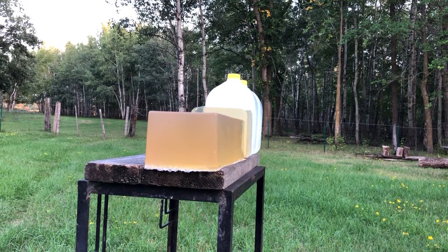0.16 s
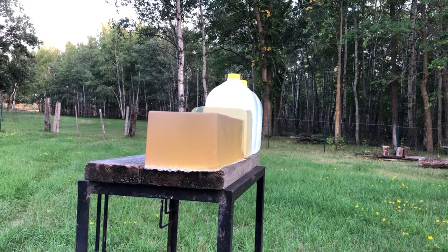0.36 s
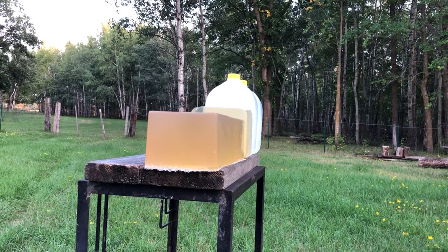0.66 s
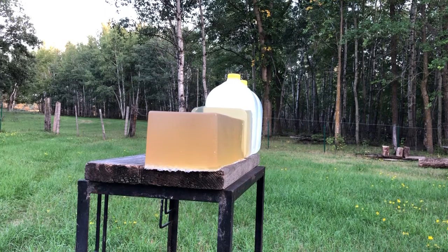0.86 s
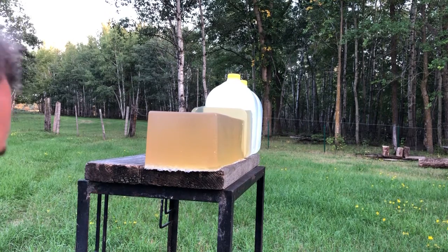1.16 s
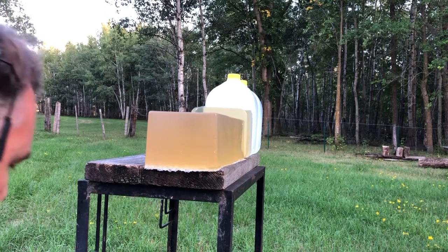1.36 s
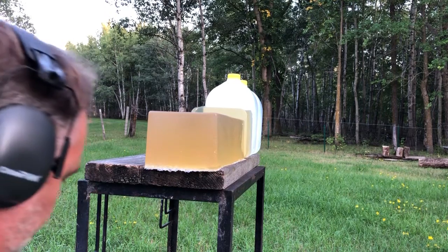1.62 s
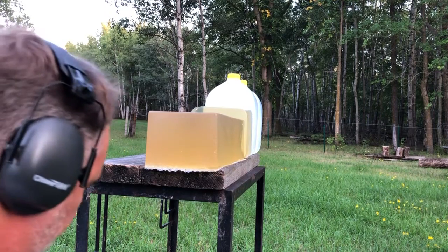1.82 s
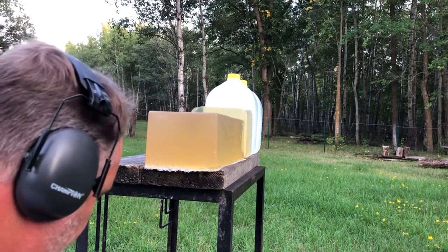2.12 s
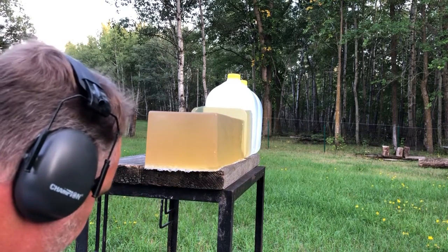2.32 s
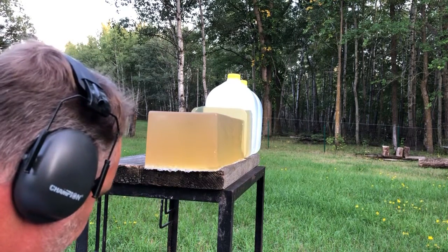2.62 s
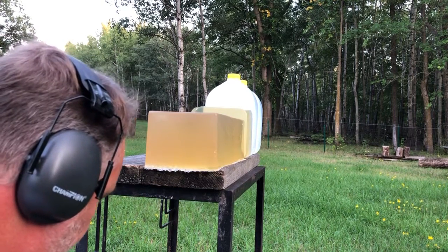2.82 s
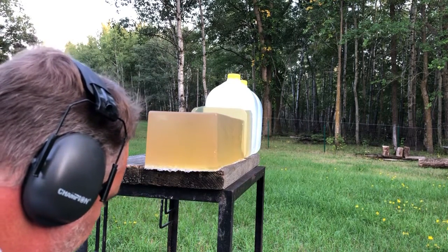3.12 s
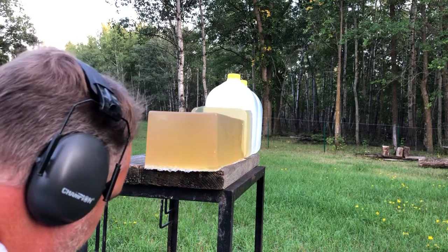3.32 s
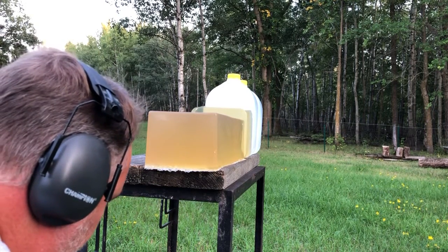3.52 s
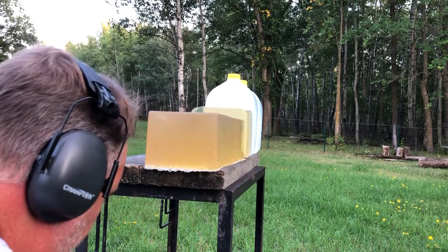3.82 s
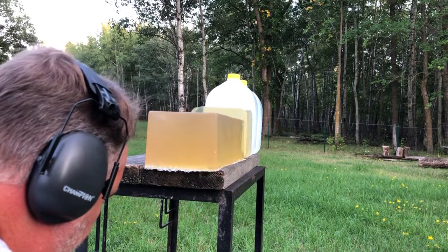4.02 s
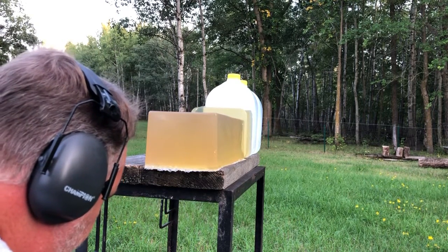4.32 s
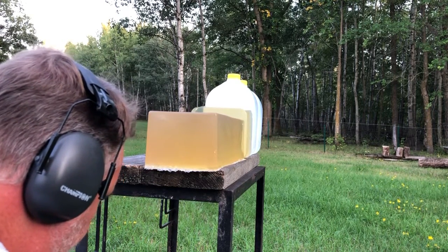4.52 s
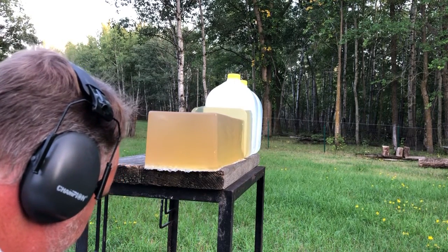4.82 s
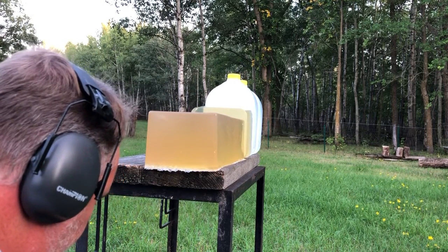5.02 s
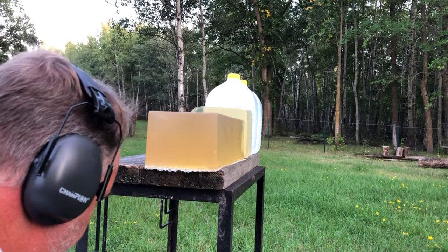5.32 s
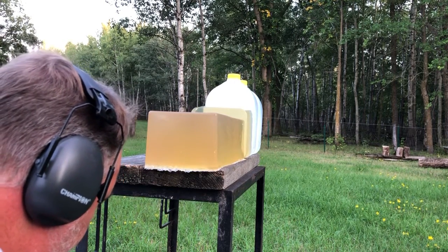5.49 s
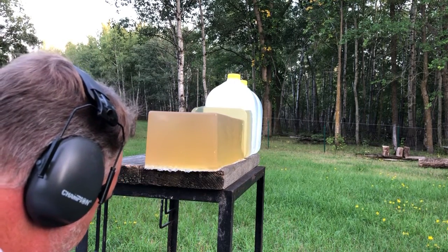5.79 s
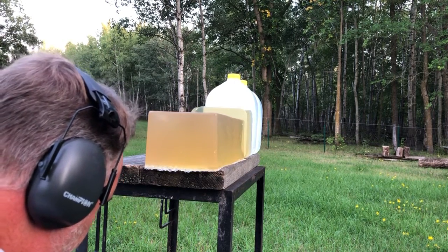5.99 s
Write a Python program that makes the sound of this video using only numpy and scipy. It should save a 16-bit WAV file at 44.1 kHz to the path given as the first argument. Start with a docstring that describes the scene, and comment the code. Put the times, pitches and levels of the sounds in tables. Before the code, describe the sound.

A steady, high shimmer of distant crickets and a faint low hum fill a quiet grassy edge of woods. Close to the microphone, cloth rustles and hollow plastic gear clicks, with a soft padded bump early on. A sparse, quiet middle follows, then from about three seconds louder snaps, creaks and rubbing come in clusters, thinning to a few isolated clicks at the end.

```python
"""A shimmering band of far crickets over a faint low hum, on a summer evening at the edge of a wood.
Close by, cloth rustles, a piece of gear ticks, creaks and snaps, and one soft bump follows.
Crickets: shaped noise plus pulsed tones; hum: a wavering sine; cloth and rubbing: swarms of tiny slips.
Gear: slip forces drive damped shell modes, a contact filter and, in snaps and rubbing, a low thud.
Far off: thin trilled sine whistles and one hollow swell of shaped noise."""
import sys
import numpy as np
from scipy import signal
from scipy.fft import rfft, irfft
from scipy.io import wavfile

SR = 44100
rng = np.random.default_rng(int(sys.argv[2]) if len(sys.argv) > 2 else 0)


def master(y):
    """Save y as 16-bit WAV."""
    cut = np.clip(np.atleast_2d(y).T, -1, 1)
    pcm = np.round(cut * 32767)  # scale
    wavfile.write(sys.argv[1], SR, pcm.astype(np.int16))


N = 271215
TIME_S = np.arange(N) / SR
BLOW_SAMPLES = SR // 100  # short sounds: level = rms of their energy over this span

# Spectra: relative density, scaled to rms 1 before use.
# cricket chorus: (frequency [Hz], density [dB per Hz])
CHORUS_SPECTRUM = [(3600, -38), (4300, -10), (4750, 0.5), (5100, -1), (5450, -3), (5850, -15),
                   (6200, -11.5), (6800, -17), (7350, -16.5), (8000, -32)]
# still outdoor air: (frequency [Hz], density [dB per Hz])
AIR_SPECTRUM = [(33, -22), (45, 6), (62, 0), (130, 0.5), (200, -3), (500, -8.5), (1200, -9), (2000, -18.5),
                (4000, -18.5), (8000, -25.5), (16000, -34)]
# rustling cloth: (frequency [Hz], density [dB per Hz])
CLOTH_SPECTRUM = [(100, -20), (250, -8), (500, -5.5), (800, 0.5), (1300, -3.5), (1900, -3), (2800, -3.5),
                  (4000, -14), (6200, -15), (9000, -24), (16000, -25)]
# dry surface contact: (frequency [Hz], density [dB per Hz])
CONTACT_SPECTRUM = [(200, -22.5), (900, -11), (1800, 2), (2300, 1), (2650, 0), (3200, 2.5), (3800, -1),
                    (4800, -2.5), (5600, -5), (6500, -4.5), (8500, -13), (12000, -17), (16000, -17)]
# soft bump: (frequency [Hz], density [dB per Hz])
BUMP_SPECTRUM = [(50, -35), (110, 4), (170, -2), (300, -2.5), (480, -5), (750, -19), (1300, -31),
                 (4000, -36), (16000, -39.5)]
# hollow swell: (frequency [Hz], density [dB per Hz])
SWELL_SPECTRUM = [(700, -31), (1080, -17), (1250, 1), (1420, -17), (2000, -49)]

# Modes: nominal, varied at each excitation.
# hollow shell: (frequency [Hz], relative level [dB], t60 [s])
SHELL_MODES = [(789, -5, 0.036), (977, -4.5, 0.043), (1130, 0.5, 0.018), (1340, 4, 0.018),
               (1549, -3, 0.028), (2167, -0.5, 0.027)]
# heavy mass behind the shell: (frequency [Hz], relative level [dB], t60 [s])
MASS_MODES = [(160, -5.5, 0.033), (260, -5.5, 0.036), (394, 1, 0.022), (533, 1.5, 0.019)]

# nearer crickets: (mean pitch [Hz], mean wing-stroke rate [1/s], nominal level [dB])
NEAR_CRICKETS = [(5150, 15, -81), (4970, 25, -73.5), (5260, 33, -77)]
# body shifts that rustle the clothes: (start [s], length [s], initial level [dB])
BODY_SHIFTS = [(0.025, 0.25, -50.5), (.285, .3, -57.5), (0.611, 0.59, -66.5), (1.292, 0.063, -57.5),
               (1.474, 0.17, -63), (1.665, 0.7, -67), (1.929, 0.16, -56), (2.585, 0.2, -75)]
# shifting grip: (start [s], end [s], mean ring level [dB])
GRIP_SHIFTS = [(0.031, .26, -60.5), (.26, .58, -60.5), (1.3, 1.78, -67), (1.879, 1.98, -58),
               (1.977, 2.32, -80), (2.536, 2.76, -81), (3.101, 4.19, -56), (4.441, 4.81, -54),
               (4.952, 5.29, -54)]
# hard snaps: (time [s], ring level [dB], contact level [dB], contact peak [Hz],
#              contact tilt [dB per octave], thud level [dB])
SNAP_EVENTS = [(0.041, -45, -52.5, 2310, 3.5, -82), (0.0937, -45.5, -65, 2700, -4, -73),
               (0.9035, -58, -51.5, 2050, 3, -70), (1.88, -40.5, -46, 2430, 1, -48),
               (3.1988, -38, -38.5, 2740, 2.5, -67), (3.205, -27.5, -41, 6100, -4, -45),
               (3.496, -35, -39, 2130, -1, -71), (4.42, -54, -31, 4370, 1.5, -69),
               (4.4223, -33, -44, 2300, -2, -61), (4.453, -36, -37.5, 2230, -4.5, -72),
               (4.616, -47.5, -35.5, 4400, -0.5, -72), (5.037, -46, -37.5, 4000, 0, -71),
               (5.056, -42, -42.5, 3940, 5, -65), (5.6046, -39.5, -43.5, 4300, 3.5, -59),
               (6.017, -42, -38, 2730, -2, -48.5), (6.0606, -52, -48.5, 3100, -3, -62),
               (6.0661, -45, -40, 2530, 0.5, -57)]
# stick-slip ticks: (time [s], ring level [dB], contact level [dB])
TICK_EVENTS = [(.0486, -46.5, -54), (0.0654, -46.5, -66), (.1045, -46.5, -64), (0.139, -62, -54.5),
               (.2292, -68, -53), (.253, -62, -56), (0.4098, -58, -58), (0.5304, -52, -50),
               (0.7474, -80, -58.5), (1.0, -56, -57.5), (1.3132, -52, -52), (1.4911, -51, -54),
               (1.5278, -54, -54.5), (1.7242, -61, -54), (1.7447, -53, -53.5), (1.9068, -51, -66),
               (1.951, -48, -57), (2.0365, -54, -55.5), (2.0881, -55, -62), (2.3012, -61, -70),
               (2.5297, -49, -57), (2.6117, -58, -60), (2.6467, -53, -53.5), (2.732, -52.5, -56),
               (2.7464, -49.5, -52.5), (2.81, -59, -61.5), (3.0897, -39, -47), (3.1431, -46, -53),
               (3.1638, -48, -47.5), (3.22, -35, -51), (3.327, -41.5, -47), (3.3687, -38, -46.5),
               (3.444, -39, -46.5), (3.5665, -44.5, -55.5), (3.582, -47.5, -60), (3.6253, -51.5, -61),
               (3.6436, -54, -66), (3.6964, -54, -55), (3.7349, -55, -56.5), (3.8558, -42, -61),
               (3.8838, -42.5, -52.5), (3.9477, -50.5, -66), (3.9735, -47, -64), (4.0413, -46.5, -60),
               (4.0948, -45.5, -59), (4.134, -46, -61), (4.179, -42.5, -55), (4.4449, -34, -53),
               (4.4863, -41.5, -48), (4.6424, -39.5, -59), (4.7295, -43.5, -56), (4.7706, -38.5, -50),
               (4.797, -48, -57.5), (4.8347, -48, -58), (4.974, -40.5, -53), (5.0107, -39, -55),
               (5.0708, -34.5, -51), (5.1129, -43, -52), (5.1641, -39.5, -53), (5.2104, -46, -61.5),
               (5.276, -46.5, -62), (5.733, -56.5, -62), (6.1346, -64, -63.5)]
# harder push favours higher shell modes: (ring level [dB], ring centre [Hz])
PUSH_TO_CENTRE = [(-54, 790), (-35, 1500)]
# far whistles: (start [s], end [s], mean pitch [Hz], peak level [dB],
#                octave overtone peak level [dB], trill depth [0-1])
FAR_WHISTLES = [(2.28, 2.39, 6260, -68, -82, .9), (5.62, 5.73, 6270, -71, -81, .8),
                (5.72, 6.04, 7450, -89, -86, 0)]
# rubbing strokes: (start [s], end [s], ring level [dB], contact level [dB], rumble level [dB])
RUB_STROKES = [(1.93, 1.964, -56, -68, -59), (3.07, 3.124, -47.5, -51, -54.5),
               (3.101, 3.344, -51, -56.5, -66.5), (3.178, 3.244, -46.5, -51, -56.5),
               (3.317, 3.42, -50.5, -57, -87), (3.473, 3.525, -45.5, -55.5, -70.5),
               (3.714, 3.743, -41.5, -52, -73), (3.778, 3.894, -45, -50.5, -61),
               (3.892, 3.936, -41, -51.5, -74), (4.149, 4.202, -51.5, -54.5, -67),
               (4.355, 4.394, -49.5, -49.5, -86), (4.391, 4.486, -43, -50.5, -61.5),
               (4.562, 4.612, -60, -51, -80), (4.458, 4.803, -58.5, -61.5, -81),
               (4.946, 5.012, -52, -61, -70), (5.024, 5.081, -45, -41.5, -64),
               (5.069, 5.129, -54.5, -59.5, -68), (5.116, 5.176, -49, -47.5, -61.5)]
# rubbing colour against contact/ring balance:
# (contact over ring [dB], contact peak [Hz], contact tilt [dB per octave])
SLIDE_COLOURS = [(-12, 2300, -6.5), (-6.5, 6300, -1), (15, 1900, -0.5), (12, 5200, -2)]

CHORUS_DB, AIR_DB = -67, -65
HUM_HZ, HUM_DB = 90.6, -66.5
SHIFT_RISE_S, SHIFT_RELEASE_S, SHIFT_FADE_DB = 0.0079, 0.037, -5.5
CREEP_S, CREEP_DB = 0.0025, -17.5  # surfaces creep just before a slip
GRIP_TICKS_PER_S, GRIP_SPREAD_DB, GRIP_CONTACT_OVER_RING_DB = 36, 2, -15
SNAP_DECAY_S = 0.0023
SNAP_RING_HZ, SNAP_SINK_HZ_PER_DB = 930, 12  # a stronger thud relative to the ring lowers the ring centre
AGAIN_S, AGAIN_RING_DB, AGAIN_CONTACT_DB = 0.012, -10.5, -11  # second slip, relative to the first
BUMP_S, BUMP_DECAY_S, BUMP_DB = 0.319, 0.0077, -38
SWELL_S, SWELL_WIDTH_S, SWELL_DB = 1.26, 0.076, -64
TRILL_PER_S = 50
EDGE_HZ = 16100


def amp(db):
    """Decibels to gain."""
    return 10 ** (np.asarray(db) / 20)


def unit(x):
    """Scales to rms 1."""
    return x / np.sqrt(np.mean(x ** 2) + 1e-20)


def blow(x):
    """Scales a short sound to the energy of BLOW_SAMPLES at rms 1."""
    return x * np.sqrt(BLOW_SAMPLES / (np.sum(x ** 2) + 1e-20))


def add(mix, start_s, sound):
    """Mixes a sound in at start_s, cut at the end of the mix."""
    part = mix[max(round(start_s * SR), 0):][:len(sound)]
    part += sound[:len(part)]


def spectrum_db(points, size):
    """Interpolates a spectrum over log frequency to the FFT bins."""
    hz, db = np.transpose(points)
    bins_hz = np.fft.rfftfreq(size, 1 / SR)
    return np.interp(np.log(bins_hz + 1), np.log(hz), db)


def noise(points, size=N):
    """Gaussian noise of rms 1 with the given spectrum."""
    white = rfft(rng.standard_normal(size))
    return unit(irfft(white * amp(spectrum_db(points, size)), size))


def drift(rate_hz):
    """Smooth random drift of rms 1: noise through a Gaussian low-pass."""
    hz = np.fft.rfftfreq(N, 1 / SR)
    white = rfft(rng.standard_normal(N))
    return unit(irfft(white * np.exp(-(hz / rate_hz) ** 2), N))


def ring(force, modes, detune=0.055, uneven_db=2.0, size=3000):
    """Force drives damped modes; pitch and strength vary a little at each call."""
    hz, db, t60_s = np.transpose(modes)[:, :, None]
    shift, strength = rng.standard_normal((2, len(modes), 1))
    t = np.arange(size) / SR
    decay = np.exp(-np.log(1000) * t / t60_s)
    tone = np.cos(2 * np.pi * hz * (1 + detune * shift) * t)
    response = amp(db + uneven_db * strength) * decay * tone
    return signal.fftconvolve(force, response.sum(0))


def shell(force, centre_hz, focus_db=11, cut_hz=560, top_hz=2600):
    """Finger position favours modes near centre_hz; the small shell radiates little bass."""
    modes = [(hz, db - focus_db * np.log2(hz / centre_hz) ** 2, t60_s) for hz, db, t60_s in SHELL_MODES]
    band = signal.butter(2, [cut_hz, top_hz], "band", fs=SR, output="sos")
    return signal.sosfilt(band, ring(force, modes))


def mass(force, cut_hz=110, top_hz=480):
    """The heavy mass answers the force with low damped modes."""
    band = signal.butter(2, [cut_hz, top_hz], "band", fs=SR, output="sos")
    return signal.sosfilt(band, ring(force, MASS_MODES))


def contact(force, peak_hz, tilt_db, peak_db=7, peak_octaves=0.38, size=1024):
    """Direct surface crack: a causal filter with one broad peak, tilted above 2 kHz."""
    hz = np.fft.rfftfreq(size, 1 / SR) + 1
    octaves = np.log2(np.maximum(hz / 2000, 1))
    peak = np.exp(-(np.log2(hz / peak_hz) / peak_octaves) ** 2)
    colour_db = spectrum_db(CONTACT_SPECTRUM, size) + tilt_db * octaves + peak_db * peak
    # fold the cepstrum for minimum phase
    cepstrum = irfft(np.log(amp(colour_db)))
    response = irfft(np.exp(rfft(2 * cepstrum[:size // 2], size)))
    return signal.fftconvolve(force, response / np.linalg.norm(response))


def slip(decay_s, scrape, rise_s=0.00099, size=700):
    """Slip force: a faint growing creep, a sharp release CREEP_S later, a dying scrape."""
    t = np.arange(size) / SR
    envelope = (1 - np.exp(-t / rise_s)) * np.exp(-t / decay_s)
    force = scrape * blow(rng.standard_normal(size) * envelope)
    force[0] += np.sqrt(BLOW_SAMPLES)  # release impulse
    creep = (rng.standard_normal(size) * t)[t < CREEP_S]
    return np.concatenate([amp(CREEP_DB) * blow(creep), blow(force)])


def grains(per_s, spread_db, clump_db, clump_hz, hiss, count=6):
    """Friction: a swarm of tiny uneven slips, split into bands that clump independently."""
    sizes = amp(spread_db * np.minimum(rng.exponential(1, N), 4)) * rng.choice([-1, 1], N)
    hits = rng.random(N) < per_s / SR
    swarm = unit(sizes * hits) + hiss * rng.standard_normal(N)
    out = np.zeros(N)
    for edge_hz in np.geomspace(1200, 16000, count):
        low_pass = signal.butter(4, edge_hz, fs=SR, output="sos")
        patch = signal.sosfiltfilt(low_pass, swarm)
        out += patch * amp(clump_db * np.minimum(drift(clump_hz), 1.6))
        swarm = swarm - patch
    return out


def crickets(shimmer_db=0.46, wander_hz=70):
    """Far crickets blur into a noise band; nearer tones pulse through it, one chirp a wing stroke."""
    out = amp(CHORUS_DB + shimmer_db * drift(28)) * noise(CHORUS_SPECTRUM)
    for hz, strokes_per_s, db in NEAR_CRICKETS:
        stroke_rate = strokes_per_s * (1 + 0.086 * drift(3.1))
        wings = np.sin(np.pi * np.cumsum(stroke_rate) / SR) ** 4
        pitch_hz = hz + wander_hz * drift(116.7)
        tone = np.sin(2 * np.pi * np.cumsum(pitch_hz) / SR)
        out += amp(db + 3.1 * drift(4.4)) * unit(wings * tone)
    return out


def distance(waver_hz=3.33, waver_db=3.0, swell_db=0.4):
    """Open air as shaped noise, and the hum of some far engine as a sine wavering in pitch and level."""
    pitch_hz = HUM_HZ + waver_hz * drift(7.5)
    tone = np.sin(2 * np.pi * np.cumsum(pitch_hz) / SR)
    hum = amp(HUM_DB) * unit(tone * amp(waver_db * drift(4.5)))
    air = amp(AIR_DB + swell_db * drift(1)) * noise(AIR_SPECTRUM)
    return hum + air


def cloth():
    """Fine friction crackle; each body shift starts quickly, slackens and stops."""
    friction = grains(per_s=2200, spread_db=2.8, clump_db=5.0, clump_hz=90, hiss=0.76)
    rustle = irfft(rfft(friction) * amp(spectrum_db(CLOTH_SPECTRUM, N)), N)
    motion = np.zeros(N)
    for start_s, length_s, db in BODY_SHIFTS:
        t = np.arange(0, length_s, 1 / SR)
        rise = np.minimum(t / SHIFT_RISE_S, 1)
        release = np.minimum((length_s - t) / SHIFT_RELEASE_S, 1)
        add(motion, start_s, rise * release * amp(db + SHIFT_FADE_DB * t / length_s))
    return motion * unit(rustle)


def tick(ring_db, contact_db, tilt_db=-3, decay_s=0.0047, peak_hz=2470, size=3700):
    """One small slip: the shell rings and the surfaces crack."""
    force = slip(decay_s, scrape=0.88)
    centre_hz = np.interp(ring_db, *np.transpose(PUSH_TO_CENTRE))
    sound = np.zeros(size)
    add(sound, 0, amp(ring_db) * blow(shell(force, centre_hz)))
    add(sound, 0, amp(contact_db) * blow(contact(force, peak_hz, tilt_db, peak_db=6.5)))
    return sound


def creaks(count=48):
    """A shifting grip loads the shell until it slips, repeatedly at uneven intervals."""
    out = np.zeros(N)
    for start_s, end_s, mean_ring_db in GRIP_SHIFTS:
        times_s = start_s + np.cumsum(rng.uniform(0.3, 1.7, count)) / GRIP_TICKS_PER_S
        rings_db = mean_ring_db + GRIP_SPREAD_DB * rng.standard_normal(count)
        for time_s, ring_db in zip(times_s, rings_db):
            if time_s < end_s:
                add(out, time_s, tick(ring_db, ring_db + GRIP_CONTACT_OVER_RING_DB))
    return out


def snaps():
    """Hard parts catch and let go: one slip force gives crack, ring and thud."""
    out = np.zeros(N)
    for time_s, ring_db, contact_db, peak_hz, tilt_db, thud_db in SNAP_EVENTS:
        force = slip(SNAP_DECAY_S, scrape=2.34)
        centre_hz = SNAP_RING_HZ + SNAP_SINK_HZ_PER_DB * (ring_db - thud_db)
        start_s = time_s - CREEP_S  # release lands on time_s
        add(out, start_s, amp(ring_db) * blow(shell(force, centre_hz)))
        add(out, start_s, amp(contact_db) * blow(contact(force, peak_hz, tilt_db)))
        add(out, start_s, amp(thud_db) * blow(mass(force)))
    return out


def ticks():
    """Stick-slip: each tick is followed by a weaker second slip."""
    out = np.zeros(N)
    for time_s, ring_db, contact_db in TICK_EVENTS:
        add(out, time_s - CREEP_S, tick(ring_db, contact_db))
        again_s = time_s + AGAIN_S * rng.uniform(0.6, 1.3)
        add(out, again_s, tick(ring_db + AGAIN_RING_DB, contact_db + AGAIN_CONTACT_DB))
    return out


def bump():
    """Padded bump: low noise under a two-sided exponential, a few hundredths of a second long."""
    envelope = np.exp(-abs(TIME_S - BUMP_S) / BUMP_DECAY_S)
    return amp(BUMP_DB) * blow(noise(BUMP_SPECTRUM) * envelope)


def far_sounds(waver=0.007):
    """One hollow swell of noise and thin wavering sine whistles, some trilled."""
    swell = np.exp(-((TIME_S - SWELL_S) / SWELL_WIDTH_S) ** 2)
    out = amp(SWELL_DB) * noise(SWELL_SPECTRUM) * swell
    bend = 1 + waver * drift(12)
    for start_s, end_s, hz, db, overtone_db, depth in FAR_WHISTLES:
        during = (TIME_S >= start_s) & (TIME_S < end_s)
        phase = 2 * np.pi * np.cumsum(hz * bend[during]) / SR
        trill = 1 - depth * np.sin(np.pi * TRILL_PER_S * TIME_S[during]) ** 2
        tone = trill * (amp(db) * np.sin(phase) + amp(overtone_db) * np.sin(2 * phase))
        add(out, start_s, tone * signal.windows.tukey(len(tone), 0.5))
    return out


def rubbing(fade=0.49, centre_hz=1250):
    """Each finger stroke drags a swarm of slips over the shell: ring, contact hiss and low rumble."""
    out = np.zeros(N)
    friction = grains(per_s=1800, spread_db=3.0, clump_db=4, clump_hz=125, hiss=0.32)
    balance_db, peaks_hz, tilts_db = np.transpose(SLIDE_COLOURS)
    for start_s, end_s, ring_db, contact_db, rumble_db in RUB_STROKES:
        peak_hz = np.interp(contact_db - ring_db, balance_db, peaks_hz)
        tilt_db = np.interp(contact_db - ring_db, balance_db, tilts_db)
        length = max(round((end_s - start_s) * SR), BLOW_SAMPLES)
        force = friction[round(start_s * SR):][:length]
        force = force * signal.windows.tukey(len(force), fade)
        held = np.sqrt(len(force) / BLOW_SAMPLES)  # makes the level an rms over the stroke
        add(out, start_s, held * amp(ring_db) * blow(shell(force, centre_hz)))
        add(out, start_s, held * amp(contact_db) * blow(contact(force, peak_hz, tilt_db, peak_db=1)))
        add(out, start_s, held * amp(rumble_db) * blow(mass(force)))
    return out


def scene():
    """Dry, close handling in front of the far evening."""
    evening = crickets() + distance() + far_sounds()
    handling = cloth() + creaks() + snaps() + ticks() + bump() + rubbing()
    return (evening + handling)[None]


def record(dry):
    """The recorder's band limit: a linear-phase low-pass at EDGE_HZ."""
    low_pass = signal.firwin(511, EDGE_HZ, window=("kaiser", 9), fs=SR)
    return signal.oaconvolve(dry, low_pass[None], "same")


dry = scene()
out = record(dry)
master(out)
```